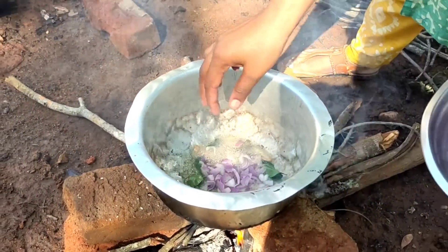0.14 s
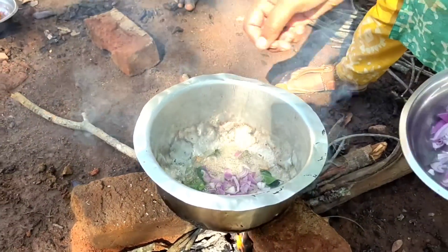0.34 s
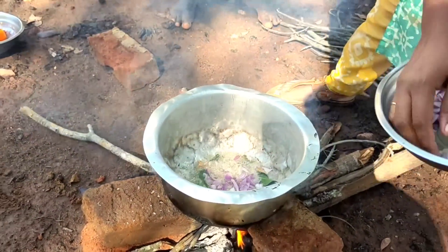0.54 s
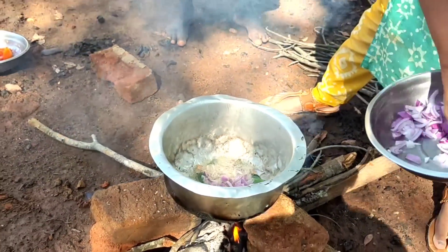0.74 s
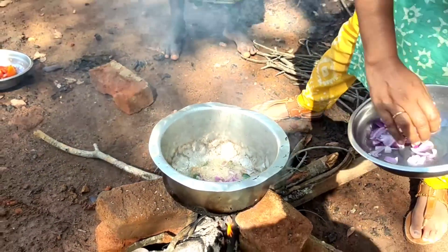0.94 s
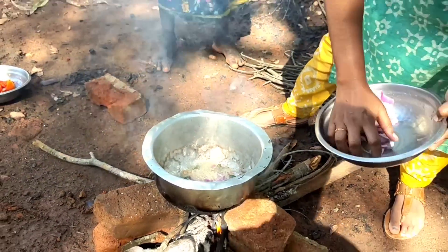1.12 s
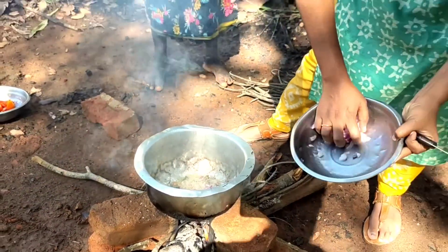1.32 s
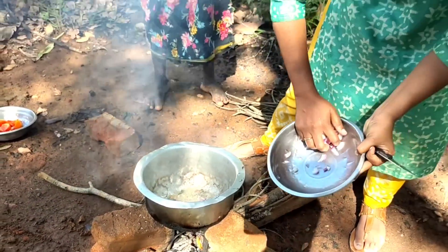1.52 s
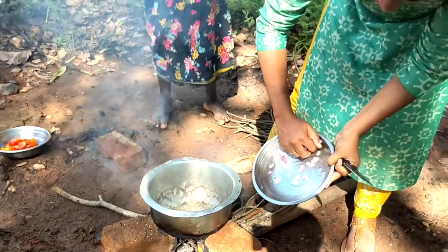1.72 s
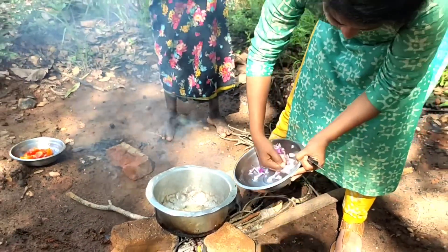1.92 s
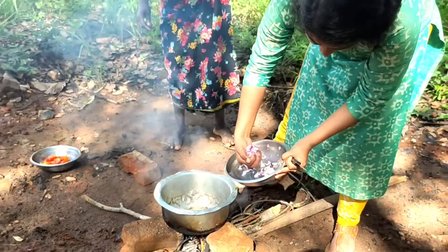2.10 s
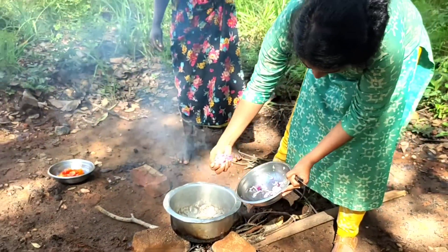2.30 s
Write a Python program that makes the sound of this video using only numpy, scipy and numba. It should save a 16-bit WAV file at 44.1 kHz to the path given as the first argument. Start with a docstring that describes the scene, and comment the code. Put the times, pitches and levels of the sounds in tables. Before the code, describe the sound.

Onions sizzle in hot oil in a metal pot, already loud and bright at 0 s, dense with crackles, sharp pops and thin spits. A short bassy thud comes near 0.46 s. From about 0.5 to 1 s the sizzle weakens, then recedes, with scattered pops near 1.4, 1.5 and 1.6 s. By 2.4 s only faint frying and small ticks remain over a very soft, low outdoor fire murmur.

```python
"""A dense, bright sizzle crackles with loud pops and thin spits, then sinks away: onions fry in hot oil.
Thousands of steam bubbles sound as short damped rings of rising pitch, in flurries, over steam noise.
Pops and spits are leading rings with fading trails; big bubbles thud at low pitch.
Pot-wall scatter and a pot and microphone response colour the oil; fire and open air murmur beneath
as filtered noise. The microphone backs away."""
import sys
import numpy as np
from scipy import signal
from scipy.fft import rfft, irfft
from scipy.io import wavfile
from scipy.ndimage import uniform_filter1d
from numba import njit

SR = 44100
rng = np.random.default_rng(int(sys.argv[2]) if len(sys.argv) > 2 else 0)


def file_out(sig):
    """Save sig as 16-bit WAV at sys.argv[1]."""
    # one column per channel
    cols = np.atleast_2d(sig).T
    # limit, then scale
    lim = np.clip(cols, -1, 1)
    pcm = np.round(lim * 32767).astype(np.int16)
    wavfile.write(sys.argv[1], SR, pcm)


N = 108133  # samples
SECONDS = np.arange(N) / SR


def undb(db):
    """Logarithmic level: decibels become an amplitude ratio."""
    return 10 ** (np.asarray(db) / 20)


def shape(table, hz):
    """Spectral envelope: (Hz, dB) points joined linearly over log frequency."""
    f, db = np.array(table, float).T
    return np.interp(np.log(np.maximum(hz, 1)), np.log(np.maximum(f, 1)), db)


def response(db):
    """Minimum phase: a folded cepstrum turns a dB curve on 1025 bins into a causal impulse response."""
    cepstrum = irfft(db * np.log(10) / 20)
    cepstrum[1:1024] *= 2
    cepstrum[1025:] = 0
    return irfft(np.exp(rfft(cepstrum)))[:1024]


def walk(rate, count=1):
    """Slow random modulation: levels held 1 / rate seconds, smoothed, with unit spread."""
    hold = max(int(SR / rate), 2)
    levels = rng.standard_normal((count, N // 50))[:, :N // hold + 1]
    smooth = uniform_filter1d(np.repeat(levels, hold, axis=1), hold)[:, :N]
    return smooth / smooth.std(axis=1, keepdims=True)


@njit
def add(out, start, hz, cycles, swell, glide, left, right, lead):
    """Damped oscillation: each grain swells, rings at a rising pitch and dies, phase-shifted at right."""
    for g in range(len(start)):
        w = 2 * np.pi * hz[g] / SR
        ring_samples = 2 * np.pi * cycles[g] / w
        fade = np.exp(-2 / ring_samples)
        z, turn = 1 + 0j, np.exp(1j * w * lead[g] * SR)
        step, bend = fade * np.exp(1j * w), np.exp(1j * w * glide / ring_samples)
        rise = 0.
        end = start[g] + int(3 * cycles[g] * SR / hz[g]) + 2
        for i in range(start[g], min(len(out[0]), end)):
            rise = min(rise + hz[g] / SR / (swell * cycles[g]), 1.)
            out[0, i] += left[g] * rise * z.imag
            out[1, i] += right[g] * rise * (z * turn).imag
            z *= step
            step *= bend
    return out


SWELL, GLIDE = .4, 0.081  # rise time and fractional pitch rise, both per the grain's cycles
# Phase lead of the right port and its spread [s]: bubbles lie all over the pot
LEAD_S, LEAD_SPREAD_S = -0.000034, .00008


def grains(t, hz, cycles, db, pan_db, place):
    """Superposition: grains are summed at two ports; pan is left minus right, place sets the phase lead."""
    hz = np.clip(hz, 40, 17000)
    start = np.clip(t * SR, 0, N - 1).astype(np.int64)
    left, right = undb(db + pan_db / 2), undb(db - pan_db / 2)
    lead = LEAD_S + LEAD_SPREAD_S * place
    return add(np.zeros((2, N)), start, hz, cycles + 0 * hz, SWELL, GLIDE, left, right, lead)


# Spectrum of the flames and open air: pitch_hz [Hz], relative_level_db [dB per Hz]
FIRE_SPECTRUM = [(25, -15.5), (151, -14.5), (362, -22.5), (510, -15), (1500, -26.5), (1950, -18),
                 (3300, -120)]
FIRE_DB, FIRE_SIDE, FIRE_PAN_DB = -68, .72, 3.5  # level, side share, left minus right
FIRE_FLICKER_DB, FIRE_FLICKER_PER_S = 2.5, 8.54
FIRE_FADE_DB_PER_S = -2  # the microphone backs away


def fire():
    """Spectral shaping: noise filtered to a low murmur flickers and fades."""
    gain = undb(shape(FIRE_SPECTRUM, np.arange(N // 2 + 1) * SR / N))
    murmur = irfft(rfft(rng.standard_normal((2, N))) * gain, N)
    flicker_db = FIRE_FLICKER_DB * walk(FIRE_FLICKER_PER_S, count=2)
    mid, side = murmur * undb(flicker_db + FIRE_FADE_DB_PER_S * SECONDS)
    pan_db = FIRE_PAN_DB * np.array([[.5], [-.5]])
    return (mid + FIRE_SIDE * np.array([side, -side])) * undb(FIRE_DB + pan_db) / mid.std()


# Big bubbles that thud in the pot: start_s [s], level_db [dB], pitch_hz [Hz], ring [cycles]
BIG_BUBBLES = [(0.011, -36, 380, 3), (.085, -43, 232, 3.3), (.19, -33, 557, 3.6), (0.4642, -13, 1200, 0.33),
               (0.778, -29, 1350, 1.5), (0.8648, -28, 625, 2.6), (0.867, -33, 1200, 6.3),
               (1.131, -49, 230, 2), (1.304, -46, 706, 3.4), (1.368, -38, 800, 1.5),
               (1.395, -42.5, 540, 1.6), (1.518, -43, 650, 2.3)]
THUD_PAN_DB = 4


def thuds():
    """Low resonance: a big bubble gives a few low cycles, or one short push with much bass."""
    t, db, hz, cycles = np.array(BIG_BUBBLES).T
    return grains(t, hz, np.maximum(cycles, .2), db, THUD_PAN_DB, 0 * t)


# Course of the sizzle: start_s [s], level_db [dB], treble_db of the small bubbles and steam [dB],
# lows_db of the big bubbles [dB]
SIZZLE_COURSE = [(0, -34.5, 6.5, 2.5), (.14, -35.5, 2.5, 0.5), (.26, -37, 4.5, 0.5), (.43, -38, 3, 0.5),
                 (.53, -42.5, 4.5, 1.5), (.69, -41.5, -1, -3), (.86, -41, 1, 3.5), (1.02, -49.5, -2, -1.5),
                 (1.32, -50, 3, 0.5), (1.53, -54.5, 3, 1.5), (1.8, -53.5, 1.5, -2.5),
                 (2.07, -57, -1.5, 6.5), (2.3, -58, 1, -30.5), (2.45, -60, 2.5, 1)]
BUBBLES_PER_S, BUBBLE_CYCLES = 11000, 3.16
BUBBLE_SCATTER_DB, BIGGEST_DB = 4.4, 14  # scale and ceiling of the exponential level scatter
TREBLE_SCATTER, BIG_SCATTER = 0.51, .65  # smallest and biggest bubbles are more alike
FLURRY_DB, FLURRY_PER_S, BAND_FLURRY_DB, BAND_FLURRY_PER_S = 2.5, 60, 2.4, 30
PAN_SPREAD_DB, LOW_PAN_SPREAD_DB = 2, 16  # the second adds to the first below 700 Hz
HISS_DB, STEAM_SIDE = -10, .8  # steam gain; share of its low noise that differs between ports


def bubbles():
    """Random superposition: bubble rings of all sizes, near equal power per Hz, bunch in flurries."""
    t, _, treble, lows = np.array(SIZZLE_COURSE).T
    chance = rng.random((30000, 6))[:int(BUBBLES_PER_S * N / SR)].T
    when, hz = chance[0] * N / SR, 150 + 16500 * chance[1] ** 1.5
    at = (when * SR).astype(int)
    octave = np.maximum(np.log2(hz / 150), 3).astype(int)  # all the low bubbles share one band
    size_db = np.minimum(-BUBBLE_SCATTER_DB * np.log(1 - chance[2]), BIGGEST_DB)
    size_db += FLURRY_DB * walk(FLURRY_PER_S)[0, at]
    size_db += BAND_FLURRY_DB * walk(BAND_FLURRY_PER_S, count=8)[octave, at]
    db = 10 * np.log10(hz ** (4 / 3))  # offsets the rarer and shorter high rings
    small = np.clip((hz - 6000) / 3000, 0, 1)
    db += size_db * (1 - small * (1 - TREBLE_SCATTER)) + np.interp(when, t, treble) * small
    big = np.clip((2000 - hz) / 600, 0, 1)
    db += (np.interp(when, t, lows) - size_db * (1 - BIG_SCATTER)) * big
    cycles = BUBBLE_CYCLES * (.5 + chance[3])
    pan_db = (PAN_SPREAD_DB + LOW_PAN_SPREAD_DB * (hz < 700)) * (2 * chance[4] - 1)
    return grains(when, hz, cycles, db, pan_db, 2 * chance[5] - 1)


def steam():
    """Turbulence noise: low noise is partly shared by the ports, high noise is opposed between them."""
    t, _, treble, _ = np.array(SIZZLE_COURSE).T
    mid, side, low = rng.standard_normal((3, N))
    low_noise = signal.lfilter([.5, .5], 1, mid + STEAM_SIDE * np.array([low, -low]))
    high_noise = signal.lfilter([.5, -.5], 1, np.array([side, -side]))
    return low_noise + high_noise * undb(np.interp(SECONDS, t, treble))


def sizzle():
    """Amplitude envelope: bubble foam and steam hiss follow one course of level."""
    t, level, _, _ = np.array(SIZZLE_COURSE).T
    foam = bubbles()
    return (foam / foam.std() + undb(HISS_DB) * steam()) * undb(np.interp(SECONDS, t, level))


LEAD_CYCLES, TRAIL_CYCLES = 4.6, 5.1


def flurry(t, db, hz, trail_db, half_length, pan_db, half_spread, count):
    """Clustered excitation: a sharp leading bubble, then a fading trail of neighbours near its pitch."""
    chance = rng.random((len(t), count, 4)).transpose(2, 0, 1)
    chance[:2, :, 0] = .5  # the leader is on pitch and centred
    trail = np.arange(count) > 0
    pitch = hz[:, None] * 2 ** (half_spread * 2 * (2 * chance[0] - 1))
    leader_db = (db - shape(COLOUR_CURVE, hz))[:, None]  # offsets the colour applied later
    drop_db = 10 * chance[3] + 14 * chance[2]
    level = leader_db + trail * (np.minimum(trail_db, 10)[:, None] - drop_db)
    cycles = np.where(trail, TRAIL_CYCLES, LEAD_CYCLES) + 0 * pitch
    when = t[:, None] + 2 * half_length * chance[2] * trail
    place = 2 * chance[1] - 1
    return grains(when.ravel(), pitch.ravel(), cycles.ravel(), level.ravel(), pan_db, place.ravel())


# Thin spits of oil: start_s [s], level_db [dB]
OIL_SPITS = [(0.2649, -6.5), (0.4194, -15.5), (0.4854, -13), (0.549, -22), (0.762, -19), (0.9886, -20.5),
             (1.3076, -35), (1.395, -15), (1.7675, -19), (1.7967, -25), (1.9934, -29)]
SPIT_HZ, SPIT_HALF_LENGTH_S, SPIT_HALF_SPREAD_OCTAVES, SPIT_TRAIL_DB = 12200, 0.0021, .25, -0.5


def spits():
    """High resonance: tiny bubbles ring in very short treble clusters."""
    t, db = np.array(OIL_SPITS).T
    return flurry(t, db, SPIT_HZ + 0 * t, SPIT_TRAIL_DB + 0 * t, SPIT_HALF_LENGTH_S, 0,
                  SPIT_HALF_SPREAD_OCTAVES, count=16)


# Loud pops: start_s [s], level_db [dB], pitch_hz [Hz], trail_db against the leader, before its drop [dB]
LOUD_POPS = [(0.0664, -7.5, 2580, -2.5), (0.0648, -4.5, 4560, 1), (0.084, -13, 4640, 3.5),
             (0.1085, -17.5, 4820, 12), (0.1358, -12.5, 4550, -7), (0.1749, -2, 4900, -9),
             (0.233, -6.5, 4600, -12), (0.276, -4, 4490, -16), (0.3076, -9.5, 4530, 6),
             (0.3314, -8, 6230, 3), (0.3724, -2.5, 5100, -4), (0.4229, -8, 4400, -5.5),
             (0.443, -8, 4630, -14), (0.4635, -8, 2340, -5.5), (0.472, -13, 5570, -4),
             (0.5668, -15, 2670, -1), (0.6027, -15, 4760, 2.5), (0.6477, -7, 5580, -5),
             (0.697, -17, 3540, 5), (0.7269, -9.5, 2550, -9), (0.7533, -11.5, 4120, -5),
             (0.7793, -5.5, 5400, -2), (0.8103, -20, 4660, 7), (0.865, -12.5, 2670, -9.5),
             (0.871, -10, 4170, 1), (0.7034, -18.5, 2150, -8), (0.984, -16.5, 5510, -3),
             (1.0718, -17.5, 4850, -1), (1.094, -15, 4980, 3.5), (1.1318, -15.5, 4690, 2.5),
             (1.169, -28.5, 2840, -1.5), (1.2165, -23, 4340, 2), (1.2183, -26.5, 2670, 1.5),
             (1.2775, -31, 3500, 4), (1.383, -26, 4300, 6.5), (1.4468, -24, 4800, 8),
             (1.52, -11, 4290, -10.5), (1.6132, -15, 4820, -3.5), (1.6798, -29, 2880, -6.5),
             (1.7227, -26, 2870, -8), (1.7597, -21.5, 4480, -2), (1.827, -26, 4360, -5),
             (1.876, -28, 5000, 9), (1.973, -35, 2950, 5), (1.9868, -25.5, 4460, 1), (2.0412, -31, 5100, 0),
             (2.089, -31, 4140, -3), (2.13, -27, 4750, 6), (2.1472, -30, 2820, -7), (2.215, -39, 2220, 2.5),
             (2.2455, -27.5, 5120, 3), (2.2568, -26.5, 4650, 0.5), (2.3145, -18.5, 5300, -13),
             (2.369, -38, 2530, 5), (2.4345, -17, 5010, -2.5)]
POP_HALF_LENGTH_S, POP_HALF_SPREAD_OCTAVES, POP_PAN_DB = .009, .16, -0.5


def pops():
    """Transient resonance: loud bubbles ring in clusters that stand out of the sizzle."""
    t, db, hz, trail_db = np.array(LOUD_POPS).T
    return flurry(t, db, hz, trail_db, POP_HALF_LENGTH_S, POP_PAN_DB,
                  POP_HALF_SPREAD_OCTAVES, count=20)


RIM_DB, RIM_T60_S = -6, .028


def rim(oil, count):
    """Diffuse reflection: pot walls scatter the oil; paths crossfade as the microphone moves."""
    out, step = 0, N / (count - 1)
    decay = undb(-60 * np.arange(2000) / SR / RIM_T60_S)
    for k in range(count):
        tail = rng.standard_normal((2, 2000)) * decay
        tail /= np.sqrt((tail ** 2).sum(axis=1, keepdims=True))
        share = np.cos(np.pi / 2 * np.clip((np.arange(N) - k * step) / step, -1, 1))
        out = out + signal.oaconvolve(oil * share, tail, axes=1)
    return undb(RIM_DB) * out[:, :N]


# Response of pot and microphone: pitch_hz [Hz], level_db [dB]
COLOUR_CURVE = [(88, -74), (150, -45), (244, -11.5), (404, -12.5), (510, -5), (644, 0.5), (862, -15),
                (1150, -0.5), (1570, -6.5), (1880, 1), (2560, 9), (3850, 8.5), (4860, 17), (6000, 10.5),
                (7900, 3), (11200, 2), (13900, 6.5), (15600, -17)]
# Balance of the ports: pitch_hz [Hz], left_minus_right_db [dB]
LEAN_CURVE = [(200, 5), (700, 2.5), (2400, .2), (4400, -1.8), (8000, .3), (14000, -3)]


def colour(oil):
    """Linear filtering: pot and microphone colour the oil, with a different balance at each port."""
    hz = np.arange(1025) * SR / 2048
    # the last point of the curve is left out: record() cuts the top
    body_db, lean_db = shape(COLOUR_CURVE[:-1], hz), shape(LEAN_CURVE, hz)
    ports = np.array([response(body_db + sign * lean_db / 2) for sign in (1, -1)])
    return signal.fftconvolve(oil, ports, axes=1)[:, :N]


def scene():
    """Superposition: the coloured oil and its wall scatter lie over thuds and fire."""
    background = fire() + thuds()
    oil = sizzle() + spits() + pops()
    return background + colour(oil + rim(oil, count=14))


BOTTOM_HZ, TOP_HZ = 35, 15800


def record(dry):
    """Band limiting: the microphone thins the deep bass and cuts the top."""
    high_pass = signal.butter(1, BOTTOM_HZ, "high", fs=SR, output="sos")
    low_pass = signal.ellip(10, .2, 80, TOP_HZ, fs=SR, output="sos")
    return signal.sosfilt(low_pass, signal.sosfilt(high_pass, dry))


dry = scene()
out = record(dry)
file_out(out)
```